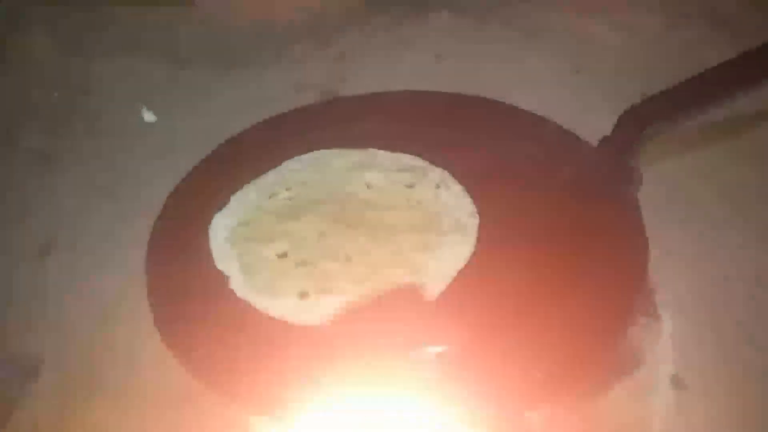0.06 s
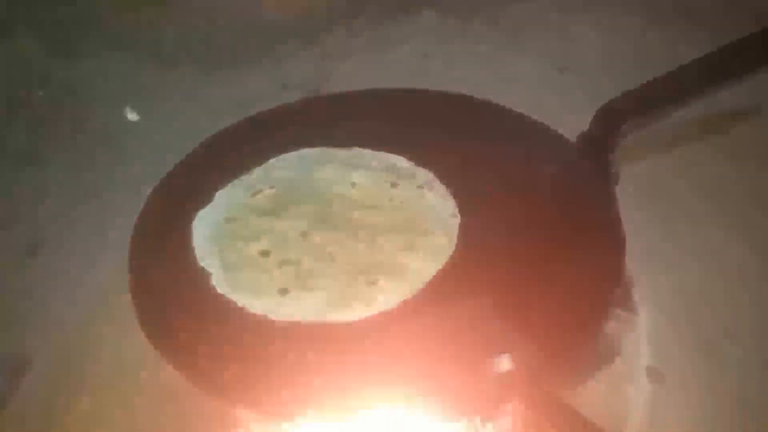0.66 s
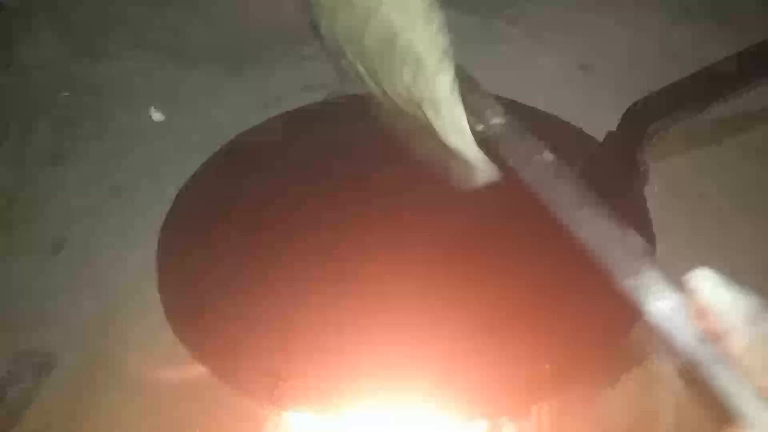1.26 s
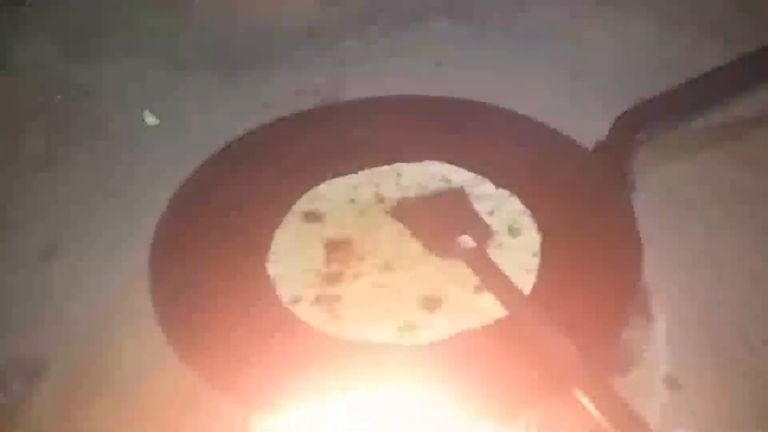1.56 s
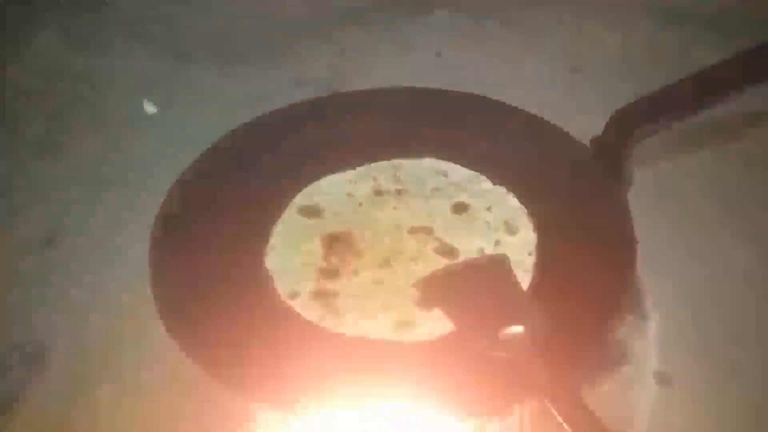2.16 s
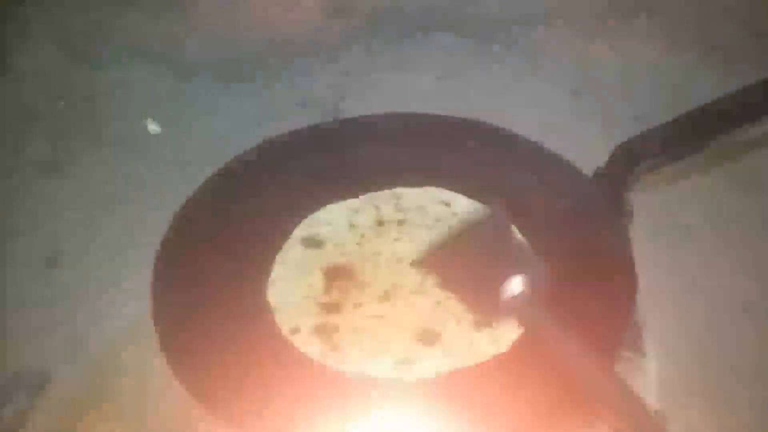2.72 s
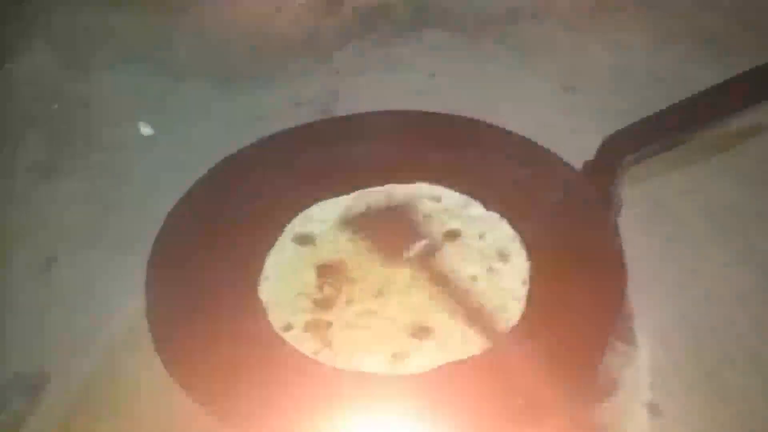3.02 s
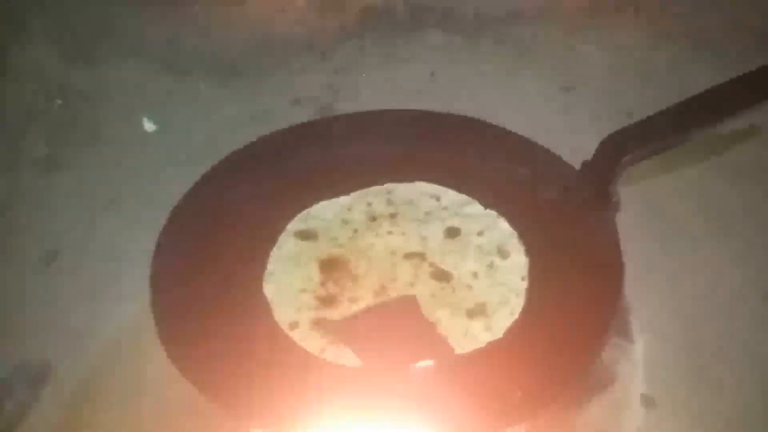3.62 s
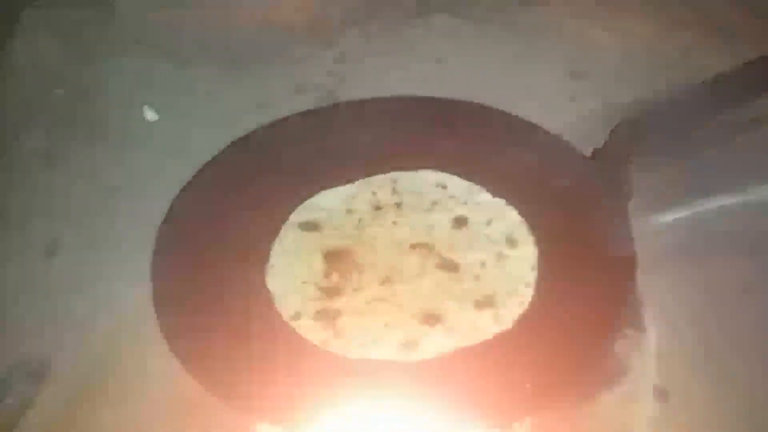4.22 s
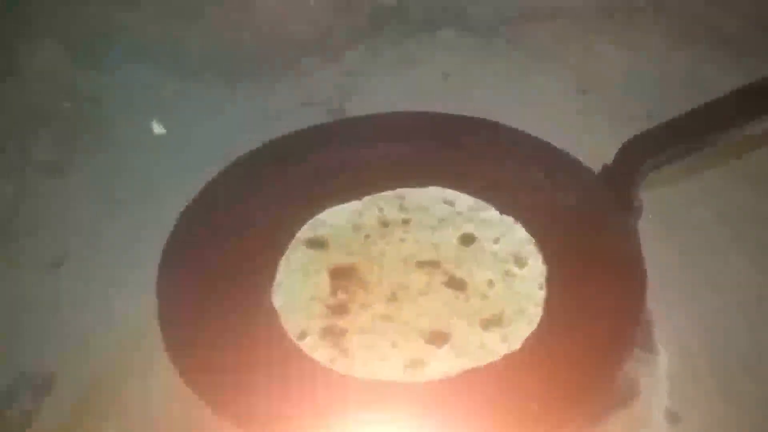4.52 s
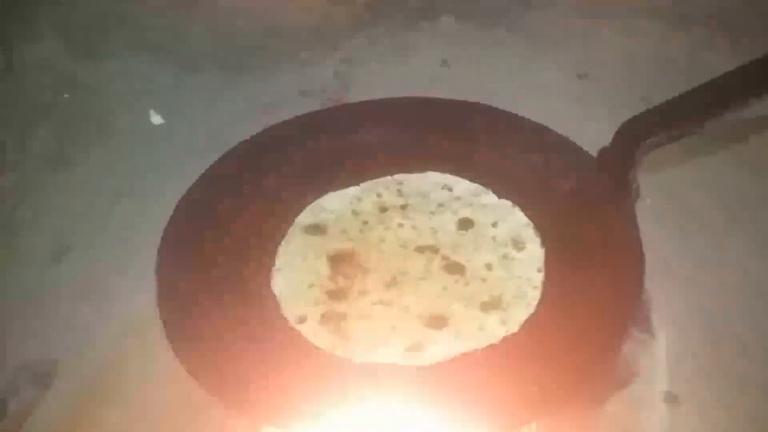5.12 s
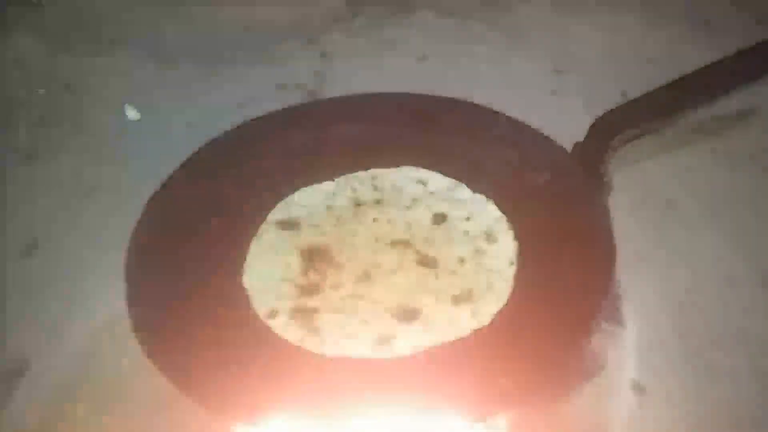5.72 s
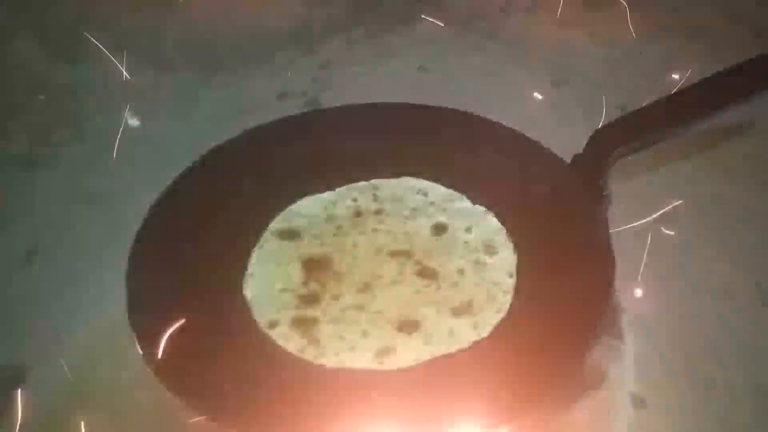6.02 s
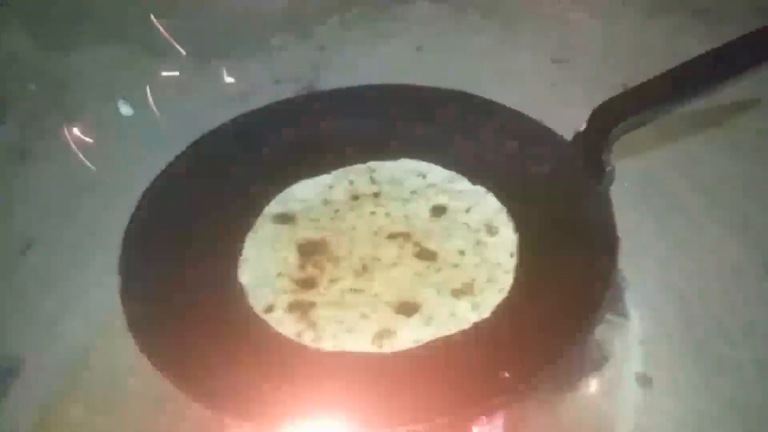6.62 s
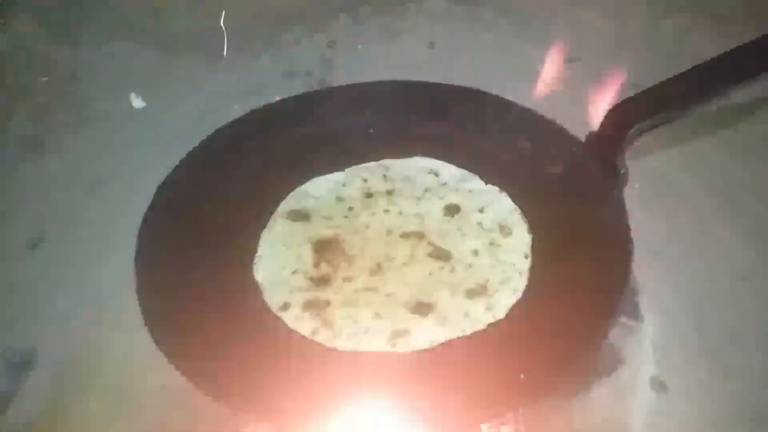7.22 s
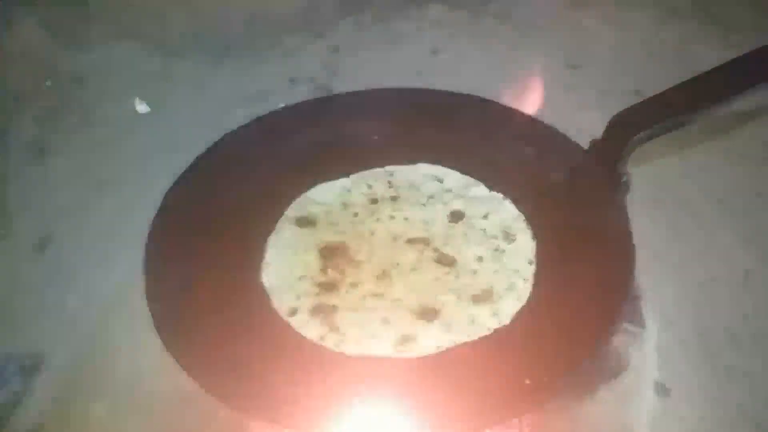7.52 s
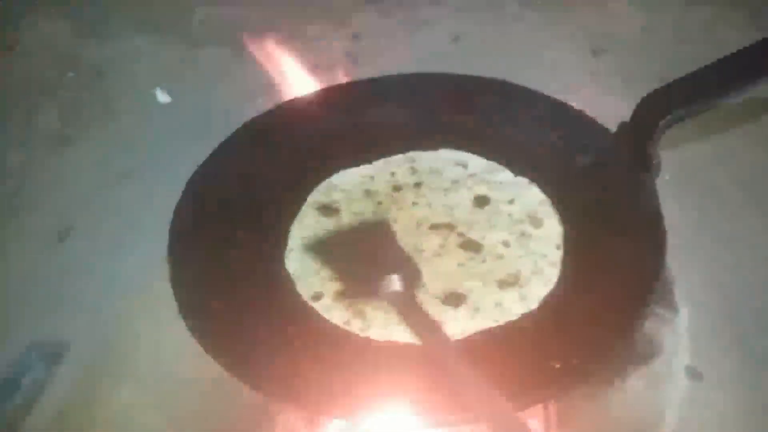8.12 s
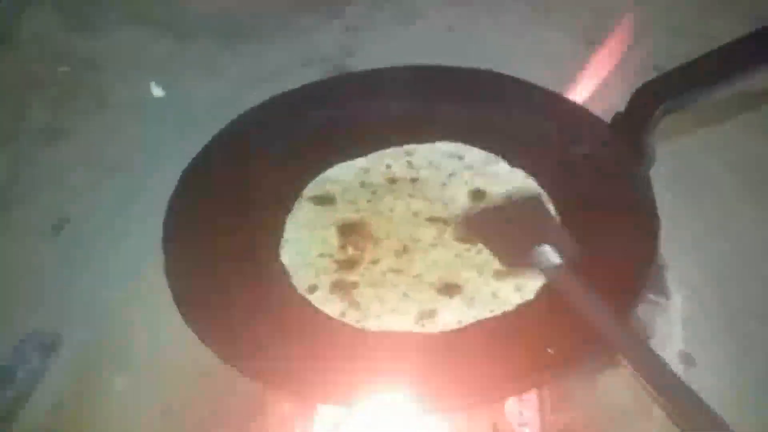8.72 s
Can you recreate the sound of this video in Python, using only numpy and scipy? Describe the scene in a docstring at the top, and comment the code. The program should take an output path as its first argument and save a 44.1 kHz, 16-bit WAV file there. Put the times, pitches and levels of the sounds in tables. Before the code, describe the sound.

Flatbread sizzles on an iron griddle as a metal spatula taps, flips and presses it, and dry sticks snap in a wood fire.

```python
"""A small kitchen, a phone microphone close to an iron griddle where flatbread bakes over a wood fire.
The flames rumble low and the dough sizzles. A steel spatula taps, slides under the bread, flips it
and presses it, ringing the iron; each press drives out steam. The spatula is put down, dry sticks
are shoved into the fire, rasp and snap, then the pressing goes on. Near walls add a short echo."""
import sys
import numpy as np
from scipy import signal
from scipy.fft import rfft, irfft
from scipy.io import wavfile
from scipy.ndimage import uniform_filter1d, map_coordinates

SR = 44100
rng = np.random.default_rng(int(sys.argv[2]) if len(sys.argv) > 2 else 0)


def wrap_up_sound(samples):
    """Save the sound to the file named by the first command line argument, as 16-bit audio."""
    columns = np.atleast_2d(samples).T
    # keep every value between -1 and 1, then stretch to whole-number steps
    tamed = np.clip(columns, -1, 1)
    steps = np.round(tamed * 32767).astype(np.int16)
    wavfile.write(sys.argv[1], SR, steps)


N = 395136
T = np.arange(N) / SR
BLOW_T = T[:SR // 2]
GRAZE_S = .003  # surfaces brush this long before they meet


def undb(db):
    """Gain of a level in dB."""
    return np.exp(np.asarray(db) * (np.log(10) / 20))


def unit(x):
    """Scale to rms 1."""
    return x / np.sqrt(np.mean(x ** 2))


def through(x, response):
    """Pass a sound through an impulse response."""
    return signal.oaconvolve(x, response)[:len(x)]


def colour(points, size=2048):
    """Causal response of unit energy with a (Hz, dB) spectrum."""
    hz, db = np.transpose(points)
    bins_hz = np.arange(size + 1) * SR / (2 * size)
    gain = undb(np.interp(np.log(bins_hz + 1), np.log(hz), db))
    cepstrum = irfft(np.log(gain))
    cepstrum[1:size] *= 2  # fold to minimum phase
    cepstrum[size + 1:] = 0
    response = irfft(np.exp(rfft(cepstrum)))[:size]
    return response / np.linalg.norm(response)


def band(x, hz, kind, order=4):
    """Butterworth filter."""
    return signal.sosfilt(signal.butter(order, hz, kind, fs=SR, output="sos"), x + 1e-18)


def fade(t60):
    """Exponential decay over the length of one blow."""
    return np.exp(-np.log(1000) * BLOW_T / t60)


def ring(modes):
    """Response of unit energy of (Hz, dB, t60) modes."""
    response = sum(undb(db) * fade(t60) * np.sin(2 * np.pi * (hz * BLOW_T + rng.random()))
                   for hz, db, t60 in modes)
    return response / np.linalg.norm(response)


def walk(rate):
    """Random levels held 1 / rate s and smoothed twice; rms 1."""
    hold = int(SR / rate)
    steps = np.repeat(rng.standard_normal(N)[:N // hold + 1], hold)
    return unit(uniform_filter1d(uniform_filter1d(steps, hold), hold)[:N])


def grains(rate, spread_db):
    """Random tiny clicks, rate a second, most small and a few large."""
    sizes = undb(spread_db * np.minimum(rng.exponential(size=N), 4))
    return unit((rng.random(N) < rate / SR) * sizes * rng.choice([-1, 1], N))


def narrow(hz, width_hz):
    """Turbulence in a resonance whose centre follows hz; rms 1."""
    noise = rng.standard_normal((2, max(len(hz), SR)))[:, :len(hz)]
    turbulence = band(noise, width_hz / 2, "low", order=2)
    phase = 2 * np.pi * np.cumsum(hz) / SR
    return unit(turbulence[0] * np.cos(phase) + turbulence[1] * np.sin(phase))


def vent(length, first_hz, last_hz, db, width_hz):
    """Gas through a gap: the sound swells and fades while its resonance glides."""
    progress = np.linspace(0, 1, int(length * SR))
    glide_hz = first_hz + (last_hz - first_hz) * progress
    return undb(db) * np.sin(np.pi * progress) * narrow(glide_hz, width_hz)


def effort(start, stop, rise_s, release_t60):
    """Gain of one push: it builds up, holds and dies away after the stop."""
    return np.clip((T - start) / rise_s, 0, 1) * undb(-60 * np.clip((T - stop) / release_t60, 0, 3))


def blow(response, t60, tick):
    """Surfaces graze, then meet with a tick and a dying chatter; coloured, peak near 1."""
    graze = undb(-15) * np.linspace(0, 1, int(GRAZE_S * SR))
    push = rng.standard_normal(len(BLOW_T)) * np.concatenate([graze, fade(t60)])[:len(BLOW_T)]
    push[len(graze)] += tick
    sound = through(push, response)
    return sound / np.sqrt(10 * uniform_filter1d(sound ** 2, size=176).max())


def add(track, s, sound):
    """Mix a sound in GRAZE_S early, so that a blow's contact falls at time s."""
    i = max(int((s - GRAZE_S) * SR), 0)
    track[i:i + len(sound)] += sound[:N - i]


# The draught under the griddle, then the quiet of the room. Each row: frequency in Hz, level in dB.
DRAUGHT_SPECTRUM = [(13, -62), (22, -33.5), (37, -21), (81, 1.5), (131, 0), (183, -13), (239, -19.5),
                    (346, -17), (428, -18), (467, -22), (502, -23), (654, -25), (964, -25), (1500, -32),
                    (1950, -53.5), (3300, -120)]
ROOM_SPECTRUM = [(590, -46), (1000, -20.5), (1530, -10), (2830, -5.5), (3170, 2), (3690, -7.5),
                 (5400, -1.5), (7630, -3.5), (8670, -0.5), (9840, -20), (15800, -16.5)]
def fire():
    """The flames flutter low and puff softly under a smooth faint hiss."""
    draught = unit(through(rng.standard_normal(N), colour(DRAUGHT_SPECTRUM)))
    flutter = undb(-66 + 1.3 * walk(rate=14))
    puffs = undb(-87 + 7 * walk(rate=25)) * narrow(np.full(N, 347), width_hz=490)
    room = unit(through(rng.standard_normal(N), colour(ROOM_SPECTRUM)))
    return flutter * draught + puffs + undb(-66.5) * room


# The bread baking by itself. Each row: time in seconds, hiss in dB.
BAKING_HISS = [(0, -54.5), (.35, -55), (1.1, -57.5), (1.42, -64), (1.7, -58.5), (2.4, -52), (2.65, -61),
               (3.1, -59), (3.9, -52), (4.4, -56.5), (4.6, -61), (5.3, -59), (6.0, -63.5), (6.8, -66.5),
               (7.25, -62.5), (7.65, -72), (7.95, -63), (8.4, -56.5)]
# Steam, mostly pressed out by the blade. Each row: start and stop in seconds, hiss in dB,
# sag in dB per second, wet sputter and fine spray in dB against the hiss.
STEAM_BURSTS = [(-.08, 0.139, -39.5, 40, -6, -1), (0.36, .65, -39, 32.5, -9, -5),
                (.84, 1.042, -51, 10, -7, 5), (1.555, 2.374, -38.5, 22, -3.5, -5.5),
                (3.074, 3.235, -39.5, -1, -6, -2), (3.206, 3.493, -41.5, 17, -3.5, -4),
                (3.449, 3.827, -48.5, 22, -5, 0), (3.984, 4.132, -41.5, 14, -7, -5),
                (4.66, 4.96, -55.5, 8, -4, -2), (8.008, 8.373, -39.5, 25.5, -3, -0.5),
                (8.596, 8.915, -43, -4, -4.5, -4)]
def steam_levels():
    """Bursts sag and dry out over the baking: hiss in dB, with sputter and spray relative to it."""
    drying_db_per_s = 9.5  # the sputter dies faster than the hiss
    hiss = undb(np.interp(T, *np.transpose(BAKING_HISS))) ** 2
    wet, spray = hiss * undb(-12.5) ** 2, hiss * undb(-10) ** 2
    for start, stop, db, sag, wet_db, spray_db in STEAM_BURSTS:
        age = np.clip(T - start, 0, stop - start)
        power = (effort(start, stop, rise_s=0.074, release_t60=0.087) * undb(db - sag * age)) ** 2
        hiss += power
        wet += power * undb(wet_db - drying_db_per_s * age) ** 2
        spray += power * undb(spray_db) ** 2
    return 10 * np.log10([hiss, wet / hiss, spray / hiss])


# The sizzle from close by. Each row: frequency in Hz, level in dB.
SIZZLE_SPECTRUM = [(350, -57.5), (600, -33), (727, -19.5), (880, -22.5), (969, -20), (1630, -21),
                   (1770, -16.5), (2900, -8), (3270, -2), (3650, -6), (5360, 0), (7650, -2.5),
                   (10100, -5.5), (15200, -4.5), (15800, -12)]
# Pockets in the bread that colour the steam. Each row: centre and width in Hz, relative level in dB.
BREAD_POCKETS = [(3316, 180, -16.5), (4105, 230, -15), (5480, 1200, -9), (7680, 380, -11.5)]
def sizzle():
    """Countless tiny bursts of steam; wet dough sputters lower, hard pressing sprays finer."""
    hiss_db, wet_db, spray_db = steam_levels()
    bursts = through(grains(rate=9000, spread_db=2.0), colour(SIZZLE_SPECTRUM))
    hiss = unit(band(band(bursts, 3900, "high"), 9900, "low"))
    wet = unit(band(bursts, 3830, "low", order=6))
    spray = unit(band(bursts, 9880, "high", order=8))
    # the largest, lowest bubbles are the first to go as the dough dries
    wet = band(wet, 2760, "high") + undb(.5 * np.clip(wet_db + 4, -14, 4)) * band(wet, 2300, "low")
    pockets = np.zeros(N)
    for hz, db_width_hz, db in BREAD_POCKETS:
        # pockets swell and shrink, so their resonances drift, come and go
        swell = undb(db + 2.1 * walk(rate=2.5) + (wet_db + 0.5) * (hz < 3800))
        pockets += swell * narrow(hz * (1 + .03 * walk(rate=6)), db_width_hz)
    steam = undb(-1.92) * hiss + undb(wet_db - 1.5) * wet + undb(spray_db - 6) * spray
    return (steam + undb(-1) * pockets) * undb(hiss_db + 0.71 * walk(rate=47))


# Modes of the griddle and blade. Each row: frequency in Hz, relative level in dB, t60 in seconds.
IRON_MODES = [(388, -10.5, .25), (735, -3, .12), (970, -6, .16), (1345, -4.5, 0.11), (1525, -3, 0.067),
              (1560, -8, 0.23), (1707, -6, .07), (2057, 1.5, 0.15), (2220, -6, 0.26), (2300, 0, .12),
              (2480, 1.5, 0.062), (2910, 1, .06), (3040, -9, 0.41), (3330, -2, 0.1), (3770, -18.5, 0.02),
              (4250, -14.5, .14), (4530, -2.5, 0.16), (4510, -13, 0.19), (5000, -3, 0.023),
              (5220, -11, 0.26), (5600, -10.5, 0.12), (6830, -10.5, .12)]
def griddle():
    """The ring of the metal, shared by steam, blows and scrapes."""
    return ring(IRON_MODES)


# The spatula meeting the griddle, then the flipped bread and blade landing, close to the microphone.
# Each row: time in seconds, crack peak in dB, chatter t60 in seconds, ring in dB against the crack.
SPATULA_TAPS = [(0.373, -18.5, 0.0087, -8.5), (0.6444, -23, 0.017, -31), (0.673, -24, 0.017, -15),
                (0.8735, -23, 0.016, -6), (0.892, -20, 0.04, -6), (1.5274, -10.5, 0.016, -40),
                (1.5543, -26, 0.039, -17), (3.0753, -29, 0.027, -4), (4.0083, -27, 0.053, -22),
                (7.973, -29.5, 0.028, -10), (7.982, -25, 0.053, -7.5), (8.568, -7.5, 0.013, -21)]
BREAD_SLAPS = [(1.447, -8.5, 0.071, -18.5), (1.463, -17.5, 0.043, -12.5), (1.472, -13.5, 0.05, -14.5),
               (1.542, -23.5, 0.045, -17)]
# The colour of each. Each row: frequency in Hz, level in dB.
TAP_SPECTRUM = [(180, -49), (300, -33), (1330, -10), (2230, -17), (2910, -6.5), (4630, -3), (5200, 1.5),
                (6560, -8), (8140, -8), (9450, -24.5), (11900, -17), (13200, -25), (15800, -31.5)]
SLAP_SPECTRUM = [(100, -32.5), (150, -7), (400, -10), (560, -17), (750, -8), (1500, 2.5), (1900, -5),
                 (2700, -4), (5200, -3.5), (8500, -13), (10000, -25.5), (15800, -25.5)]
def strikes(iron):
    """Each tap or slap cracks briefly and leaves the iron ringing."""
    out = np.zeros(N)
    for rows, spectrum, tick in (SPATULA_TAPS, TAP_SPECTRUM, 2.6), (BREAD_SLAPS, SLAP_SPECTRUM, 1.4):
        response = colour(spectrum)
        for s, db, t60, ring_db in rows:
            crack = blow(response, t60, tick)
            tail = through(crack, iron)
            tail *= np.linalg.norm(crack) / np.linalg.norm(tail)
            add(out, s, undb(db) * (crack + undb(ring_db) * tail))
    return out


# Dull blows to the griddle and the stove under it.
# Each row: time in seconds, relative level in dB, t60 in seconds, top of the blow in Hz.
STOVE_THUDS = [(0.378, -45, 0.15, 890), (0.679, -45, 0.17, 200), (1.452, -34, 0.14, 1000),
               (1.474, -39, 0.11, 800), (1.528, -35, 0.23, 800), (2.871, -60, .1, 750),
               (3.62, -64, .1, 700), (4.022, -55.5, 0.57, 400), (5.684, -30.5, 0.19, 290),
               (5.758, -46.5, 0.43, 278), (6.276, -44.5, 0.47, 350), (6.395, -36, 0.16, 960),
               (6.439, -44.5, 0.16, 1000), (8.066, -40, 0.15, 383), (8.578, -39, 0.17, 800)]
# Their colour. Each row: frequency in Hz, level in dB.
THUD_SPECTRUM = [(26, -49.5), (45, -24), (118, 6.5), (178, -8), (243, -21), (274, -11), (309, -19),
                 (340, -10), (398, -8.5), (471, -14), (599, -25), (727, -10), (800, -7.5), (1040, -46),
                 (1760, -120)]
def thuds():
    """Heavy pushes boom in the hollow stove; hard ones reach higher and add a short knocking note."""
    out, response = np.zeros(N), colour(THUD_SPECTRUM)
    note = (np.sin(2 * np.pi * 384 * BLOW_T) + np.sin(2 * np.pi * 428 * BLOW_T)) / 2 * fade(0.2)
    for s, db, t60, top_hz in STOVE_THUDS:
        note_db = 0.5 + 15.5 * np.log2(top_hz / 1000)
        push = band(band(blow(response, t60, tick=3), top_hz, "low", order=2), 65, "high", order=2)
        boom = np.sin(2 * np.pi * 121 * BLOW_T) * fade(t60 * 1.1)
        add(out, s, undb(db) * (undb(7.5) * push + undb(-14) * boom + undb(note_db) * note))
    return out


# The blade sliding on the griddle. Each row: start and stop in seconds, force in dB,
# rise and release t60 in seconds, weight of the edge's bright bite in dB.
BLADE_STROKES = [(0.627, 0.679, -29, 0.021, 0.24, -4), (0.757, 0.863, -33.5, 0.074, .3, -28.5),
                 (0.847, 0.93, -27.5, 0.039, 0.44, -14), (1.308, 1.332, -57, 0.017, 0.19, -22),
                 (8.08, 8.295, -50, 0.11, 0.17, -22)]
# Its rasp from close by. Each row: frequency in Hz, level in dB.
SCRAPE_SPECTRUM = [(400, -48.5), (600, -35.5), (740, -19), (900, -45.5), (1300, -5.5), (1750, -13.5),
                   (2200, -8), (3000, -5.5), (4700, -1.5), (6200, -4), (8300, -8), (9600, -16),
                   (15800, -18.5)]
def scrape(iron):
    """The blade sticks and slips over rough iron, ringing its modes and the griddle's main note."""
    force, edge = np.zeros((2, N))
    for start, stop, db, rise_s, t60, bite_db in BLADE_STROKES:
        push = undb(db) * effort(start, stop, rise_s, t60)
        force = np.maximum(force, push)
        edge += push * undb(bite_db)
    slips = grains(rate=4000, spread_db=0.0) * undb(1.6 * walk(rate=140))
    rasp = through(slips, colour(SCRAPE_SPECTRUM))
    # waves bounce between the edge and the jerking contact point, so the resonances shift
    lag = SR / 900 * (1 + .09 * walk(rate=28) + .03 * walk(rate=160))
    rasp = unit(sum(.5 ** k * map_coordinates(rasp, [np.arange(N) - np.round(k * lag)], order=0)
                    for k in range(3)))
    blade = undb(-3.2) * rasp + undb(-10) * unit(through(rasp, iron))
    bite = unit(band(band(slips, 8900, "high"), 16200, "low"))
    note_modes = [(984, -10, .07), (1023, -10.5, 0.29), (1096, -10, 0.056)]
    note = through(force * grains(rate=700, spread_db=4.0), ring(note_modes))
    return force * blade + undb(-17) * edge * bite + undb(-17.5) * note


# The draught swelling into a low roar.
# Each row: start and length in seconds, first and last pitch in Hz, level in dB.
DRAUGHT_ROARS = [(1.549, 0.86, 68.1, 52.4, -63.5), (3.1, 0.86, 84.7, 72.4, -65)]
def roars():
    """Air rushes past the griddle and hums in the stove."""
    out = np.zeros(N)
    for start, *swell in DRAUGHT_ROARS:
        add(out, start, vent(*swell, width_hz=33))
    return out


# Dull little ticks during the long press. Each row: time in seconds, peak in dB.
PRESS_TICKS = [(2.143, -38.5), (2.202, -38.5), (2.245, -48)]
def ticks():
    """Single soft clicks with no ring."""
    out = np.zeros(N)
    click = band(band(signal.unit_impulse(len(BLOW_T)), 2130, "low", order=2), 150, "high", order=1)
    for s, db in PRESS_TICKS:
        add(out, s + GRAZE_S, undb(db) * click / click.max())
    return out


# Escaping steam. Each row: start and length in seconds, first and last centre in Hz, level in dB.
STEAM_JETS = [(2.182, 0.21, 9500, 7850, -56.5), (2.361, 0.85, 6770, 6100, -57),
              (4.277, 0.25, 3340, 3005, -60.5), (4.683, .36, 3410, 3720, -65),
              (6.561, 0.47, 2527, 2740, -66)]
def jets():
    """Steam squeezes through small gaps in broad bands of hiss."""
    out = np.zeros(N)
    for start, *swell in STEAM_JETS:
        add(out, start, vent(*swell, width_hz=1700))
    return out


# Lone crackles from the firebox. Each row: time in seconds, peak in dB, t60 in seconds.
FIRE_CRACKLES = [(2.464, -38, 0.028), (4.3278, -41.5, 0.025), (4.6033, -33, 0.02), (6.561, -39, 0.037),
                 (7.086, -47.5, 0.25), (7.1797, -35.5, 0.13), (7.2903, -47, 0.04), (7.4646, -43, 0.025)]
def crackles():
    """Small bright pops of burning wood."""
    out = np.zeros(N)
    response = colour([(500, -42), (2000, -17), (3100, -3), (7500, 6.5), (10000, -9), (15000, -10.5)])
    for s, db, t60 in FIRE_CRACKLES:
        add(out, s, undb(db) * blow(response, t60, tick=2.1))
    return out


# Faint whistles at the stove.
# Each row: start and length in seconds, first and last pitch in Hz, relative level in dB.
THIN_WHISTLES = [(2.99, 0.11, 3180, 3190, -60), (4.752, 0.2, 3320, 3510, -53.5),
                 (7.172, 0.11, 2840, 2840, -57), (7.205, 0.19, 2880, 2840, -64.5),
                 (7.763, 0.11, 2750, 2920, -54.5), (7.83, .13, 2900, 3320, -56.5)]
def whistles():
    """Gas in a small gap sings a thin airy tone; those that end high fray into hiss."""
    out = np.zeros(N)
    for start, length, first_hz, last_hz, db in THIN_WHISTLES:
        frayed = np.clip((last_hz - 2900) / 300, 0, 1)
        add(out, start, vent(length, first_hz, last_hz, db - 7, width_hz=60 + 300 * frayed))
    return out


# Spatula and wood against the stove.
# Each row: time in seconds, peak in dB, t60 in seconds, hollow note in dB against the peak.
STOVE_KNOCKS = [(4.009, -45.5, 0.12, -5), (4.665, -27, 0.12, -15), (4.731, -44, 0.038, -14),
                (4.759, -40, 0.04, -4), (4.782, -51, 0.048, -5), (6.405, -31.5, 0.14, -16),
                (7.982, -35.5, 0.096, -15), (8.06, -36.5, 0.17, -12)]
# Their colour. Each row: frequency in Hz, level in dB.
KNOCK_SPECTRUM = [(88, -21), (150, -16), (296, -6.5), (522, -21), (905, 1), (1070, -24.5), (1880, -15.5),
                  (2300, -19.5), (3150, -11), (5760, -11), (12000, -37), (15600, -75), (22000, -120)]
def knocks():
    """Dull knocks with one hollow note that differs a little each time."""
    out, response = np.zeros(N), colour(KNOCK_SPECTRUM)
    for s, db, t60, note_db in STOVE_KNOCKS:
        note_hz = 935 * (1 + 0.042 * rng.standard_normal())
        note = np.sin(2 * np.pi * note_hz * BLOW_T) * fade(.04)
        add(out, s, undb(db) * (blow(response, t60, tick=9.2) + undb(note_db) * note))
    return out


# Sticks going into the fire. Each row: start and stop in seconds, level in dB, rise in seconds.
STICK_SHOVES = [(5.343, 5.41, -51.5, 0.055), (5.408, 5.438, -40, 0.014), (5.472, 5.61, -43, 0.032),
                (5.588, 5.679, -41.5, 0.017), (5.834, 5.885, -44.5, .006), (5.917, 5.928, -54, 0.0073),
                (6.257, 6.306, -55, .01)]
# Their modes. Each row: frequency in Hz, relative level in dB, t60 in seconds.
STICK_MODES = [(817, -31, 0.023), (1200, -25, 0.025), (1773, 8, 0.031), (2280, -28, 0.017),
               (2944, -12, 0.065), (3130, 16.5, 0.033), (3450, 4.5, 0.18), (3800, 15, 0.064),
               (7330, 8, .02)]
# Their snaps. Each row: time in seconds, level in dB, treble in dB against that level.
STICK_SNAPS = [(5.347, -46, 6.5), (5.414, -36, 7), (5.447, -22, -5.5), (5.526, -24.5, -6), (5.63, -19, -6),
               (5.654, -19.5, -7), (5.685, -13.5, -11), (5.837, -27, -10), (5.896, -26.5, -15),
               (5.919, -18.5, -16), (6.27, -34, -9), (6.319, -38.5, 12), (6.382, -23.5, -10.5),
               (6.401, -14.5, -13), (6.434, -19.5, -16), (6.44, -8.5, -7.5)]
# The colour of rubbing bark, then of a snap. Each row: frequency in Hz, level in dB.
BARK_SPECTRUM = [(240, -15), (400, -18.5), (837, -30.5), (1210, -10), (1460, -32.5), (3000, 1.5),
                 (4340, -4.5), (7100, -9), (9810, -29.5), (15800, -27)]
SNAP_SPECTRUM = [(150, -14.5), (300, -6), (600, -27), (950, -13), (1400, -13.5), (2300, -5), (3200, -5),
                 (4600, -7.5), (7300, -0.5), (10000, -16.5), (12500, -14.5), (15800, -22)]
def sticks():
    """Dry bark rasps in uneven steps and rings the sticks; twigs catch at random and sticks snap."""
    drag = np.max([undb(db) * effort(start, stop, rise_s, release_t60=0.28)
                   for start, stop, db, rise_s in STICK_SHOVES], axis=0)
    bark = grains(rate=2800, spread_db=3.0) * undb(3.8 * walk(rate=86))
    rustle = unit(through(bark, colour(BARK_SPECTRUM)))
    ringing = unit(through(bark, ring(STICK_MODES)))
    response, snap_t60 = colour(SNAP_SPECTRUM), 0.023
    twigs = through(grains(rate=130, spread_db=0.5), blow(response, snap_t60, tick=8.5))
    twigs = unit(band(twigs, 840, "high", order=2))
    out = drag * (undb(-0.5) * rustle + undb(-6) * ringing + undb(-6) * twigs)
    woody = signal.lfilter(*signal.iirpeak(1900, 2.5, fs=SR), signal.unit_impulse(256))
    for s, db, treble_db in STICK_SNAPS:
        lowest_hz = np.clip(-55 * db - 395, 150, 1500)  # light twigs radiate no bass
        snap = band(blow(response, snap_t60, tick=1.7), lowest_hz, "high", order=2)
        # thick sticks snap louder and with a lower, woodier crack
        woody_db = -2.5 + 1.1 * (db + 10.5)
        body = band(snap, 4360, "low") + undb(woody_db) * through(snap, woody)
        treble = band(snap, 5600, "high")
        treble *= np.std(snap) / np.std(treble)
        add(out, s, undb(db) * (body + undb(treble_db) * treble))
    return out


def echo(x, t60_low, t60_high):
    """Near walls return a short tail whose treble dies first."""
    noise = rng.standard_normal(len(BLOW_T))
    low = band(noise, 4200, "low", order=2) * fade(t60_low)
    high = band(noise, 5000, "high", order=1) * fade(t60_high)
    tail = (low + undb(2) * high) * np.clip((BLOW_T - .003) / 0.0029, 0, 1)
    return through(x, tail / np.linalg.norm(tail))


def scene():
    """Griddle straight ahead, firewood a touch to the left; the walls widen the sharp blows most."""
    iron = griddle()
    spatula = strikes(iron)
    wood = sticks() + crackles() + knocks()
    steam = sizzle()
    singing = undb(-21) * through(steam, iron)  # the steam faintly rings the iron
    steady = undb(-0.6) * steam + singing + jets() + scrape(iron) + whistles()
    walls = echo(undb(-4.5) * spatula + undb(-5.5) * wood, t60_low=0.19, t60_high=0.15)
    firebox = undb(-10.5) * echo(band(wood, 2000, "low"), t60_low=0.12, t60_high=0.07)
    mid = spatula + wood + walls + firebox + steady + thuds() + ticks() + fire() + roars()
    spread = undb(-21.5) * (spatula + wood) + undb(-31.5) * steady
    spread = band(band(spread, 1100, "high", order=3), 11000, "low", order=2)
    wood_left = wood * (undb(0.25) - 1)
    side = echo(spread, t60_low=.03, t60_high=0.021) + wood_left
    return np.array([mid + side, mid - side])


def record(dry):
    """The phone beside the griddle cuts the top steeply."""
    top_hz = 15850
    return signal.sosfilt(signal.ellip(10, .2, 70, top_hz, fs=SR, output="sos"), dry)


dry = scene()
out = record(dry)
wrap_up_sound(out)
```